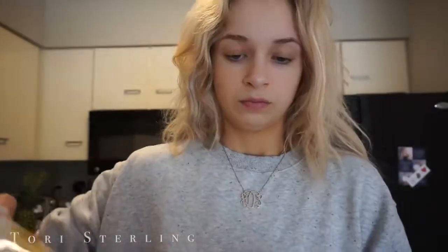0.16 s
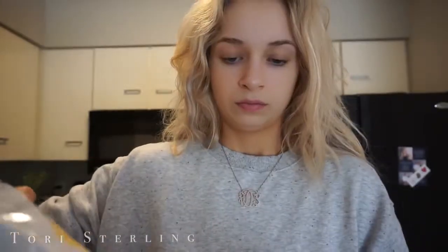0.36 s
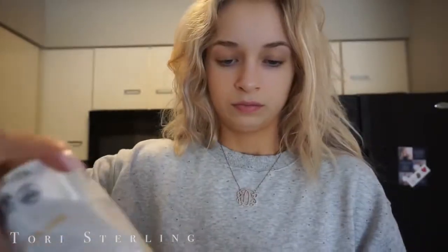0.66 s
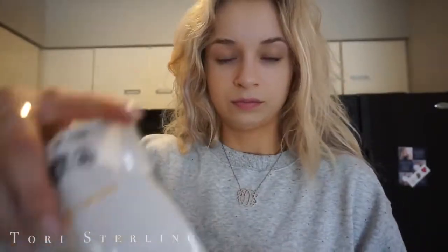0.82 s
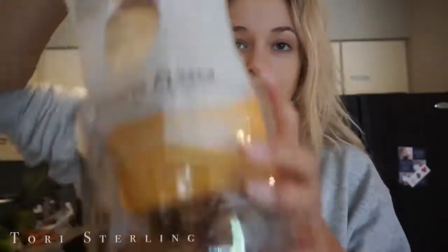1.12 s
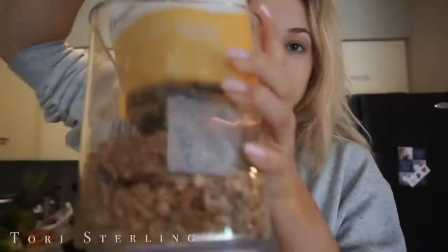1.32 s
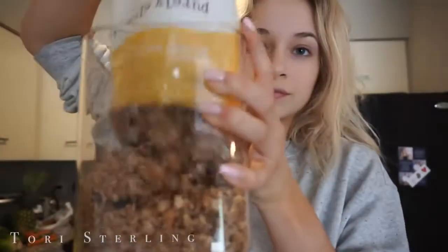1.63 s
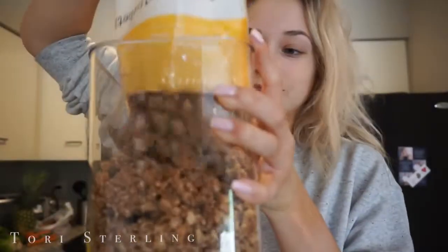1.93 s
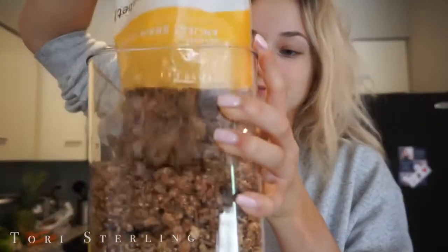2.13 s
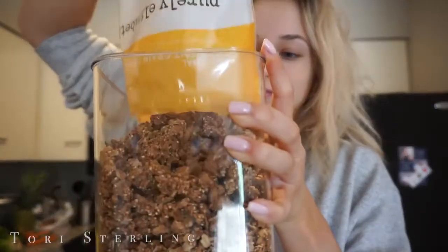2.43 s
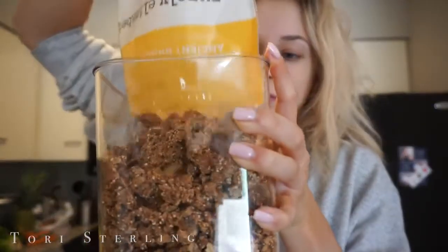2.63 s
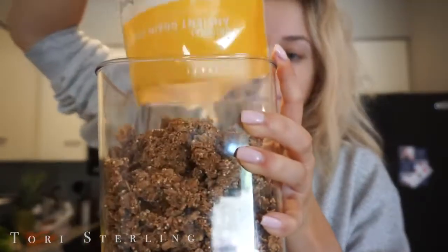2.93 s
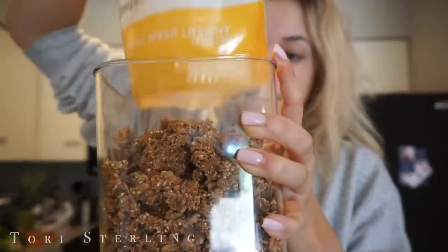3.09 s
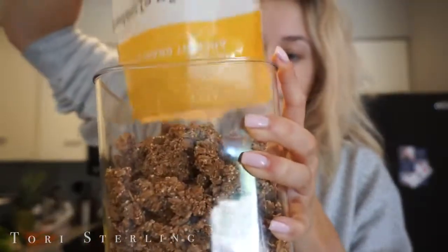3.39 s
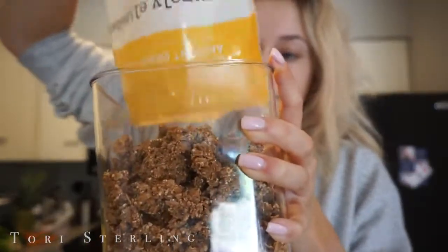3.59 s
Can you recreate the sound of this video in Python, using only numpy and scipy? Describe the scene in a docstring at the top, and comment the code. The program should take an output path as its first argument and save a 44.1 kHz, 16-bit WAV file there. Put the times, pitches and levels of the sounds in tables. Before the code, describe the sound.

Granola tumbling into a glass jar in surges, with dry clacks and crinkling pouch, then last pieces.

```python
"""In a small kitchen, dry granola slides out of a plastic pouch into a glass jar, close to the microphone.
Clusters patter as clumped grains in brief resonances and knock as short noise bursts; crumbs and film
crackle as brighter grains and ticks. The pouch thumps as damped sines, and the jar's modes ring faintly.
The flow surges, ends with a last shake and drops a few late pieces, over soft room noise and a hum."""
import sys
import numpy as np
from scipy import signal
from scipy.fft import rfft, irfft, next_fast_len
from scipy.io import wavfile
from scipy.ndimage import uniform_filter1d

SR = 44100
rng = np.random.default_rng(int(sys.argv[2]) if len(sys.argv) > 2 else 0)


def int16_out(signal):
    """Quantize to a 16-bit WAV file."""
    q = np.round(np.clip(np.atleast_2d(signal).T, -1, 1) * 32767)
    wavfile.write(sys.argv[1], SR, q.astype(np.int16))


N = 165375
T = np.arange(N) / SR  # seconds

# All levels in the event and level tables are relative: the layers trim them further.
# Spectrum of the kitchen air. Each row: frequency in Hz, relative level in dB.
AIR_COLOUR = [(30,-20),(80,-6.5),(245,-4.5),(300,-6),(395,3),(520,-24),(1070,-8.5),(1500,-25.5),(2500,-28),(16000,-47.5)]
# Kitchen reverberation. Each row: frequency in Hz, time to fall by 60 dB in seconds.
KITCHEN_T60 = [(200,0.21),(1500,0.37),(5000,0.29),(14000,0.13)]
# Modes of the jar, damped by the hand. Each entry: frequency in Hz.
JAR_MODES = [1260,1314,1520,1810,1890,1900,2150,2520,2800,3030,3330,3480]
# Pieces that strike the bare glass. Each row: start in seconds, level in dB, most excited frequency in Hz.
GLASS_HITS = [(1.448,-23,2600),(2.296,-25,3030),(2.701,-24,3400),(2.745,-32,1860),(2.791,-37,3070),(2.8089,-33,1830),(2.9165,-30,1210),(3.005,-40,1314),(3.0962,-31,1840)]
# Sharp creases of the film. Each row: time in seconds, level in dB, pitch in Hz.
FILM_SNAPS = [(0.4077,-24.5,8300),(0.465,-23,8500),(.4886,-21,8500),(.702,-18.5,6400),(0.7368,-21,11000),(1.2937,-20.5,10000),(2.096,-16.5,3950),(2.538,-26,11400),(2.645,-15.5,11100),(2.6983,-12,11300),(2.746,-24,9200),(2.7852,-16.5,12000),(2.791,-26,7740),(2.8532,-20,4530),(3.336,-52,3800)]
# The pouch flexes or a clump drops in it. Each row: start in seconds, level before decay in dB,
# pitch in Hz, time to fall by 60 dB in seconds.
POUCH_THUMPS = [(.017,-17,372,.036),(.283,-8,355,0.031),(.424,-19.5,372.5,0.14),(.462,-9.5,633,0.063),(.469,-11,533,.07),(.579,-17.5,363,0.051),(.742,-16,667,.12),(.888,-18,337,0.1),(1.028,-18,353,0.14),(1.06,-13.5,690,0.066),(1.094,-16.5,468,0.053),(1.164,-17.5,646,0.068),(1.829,-18,580,0.097),(2.328,-35.5,83.7,.26),(2.597,-7.5,720,.021),(2.601,-39.5,101,0.18),(2.913,-22.5,505,0.04)]
# Big pieces landing. Each row: start in seconds, level in dB, pitch in Hz.
PIECE_KNOCKS = [(0.015,-15.5,1180),(0.1763,-24,910),(.196,-15.5,1480),(0.2395,-13,1740),(.4622,-22,820),(.609,-14,2160),(0.7013,-9,2800),(.7423,-15.5,830),(.909,-21,2000),(0.97,-19,2470),(1.0069,-14,1500),(1.0577,-12,1380),(1.1212,-9.5,1590),(1.166,-16,1500),(1.2562,-19.5,1390),(1.345,-22,1630),(1.534,-17.5,2260),(1.803,-23,2200),(1.8304,-14.5,860),(1.954,-16.5,1700),(1.9989,-17,900),(2.0908,-13,1690),(2.148,-28,1700),(2.1782,-17,1470),(2.1961,-14,1250),(2.28,-11.5,1620),(2.3193,-16.5,1530),(2.373,-24,1860),(2.387,-27.5,770),(2.4047,-15,2500),(2.457,-25.5,1850),(2.642,-20,1610),(2.6751,-15.5,2940),(2.719,-14.5,3030),(2.747,-24,1940),(2.788,-21,3280),(2.8079,-21,1770),(2.8407,-21.5,3400),(2.9126,-23.5,1140),(2.998,-31,1540),(3.004,-30.5,1460),(3.0941,-27,1560),(3.2176,-37,1000),(3.3355,-27,2080),(3.494,-34,2240),(3.566,-40.5,1190)]
# Spectrum of those landings. Each row: frequency in Hz, gain in dB.
KNOCK_COLOUR = [(60,-31),(300,2.5),(600,8.5),(1000,-0.5),(2800,0),(3800,-5),(5500,-19.5),(9000,-12),(16000,-33)]
# Clumps break up and rattle down. Each row: start in seconds, length in seconds, level in dB;
# the edges are softened afterwards.
CLUMP_SLIDES = [(0.46,0.036,-25),(0.55,0.0087,-20),(.588,0.037,-24.5),(0.881,0.11,-29.5),(1.04,0.047,-26),(1.399,0.034,-30),(1.534,0.058,-26),(1.741,0.04,-22.5),(1.799,0.035,-23.5),(1.952,0.015,-24),(1.979,0.047,-29.5),(2.159,0.092,-34.5),(2.264,0.05,-31),(2.366,0.021,-25),(2.568,0.083,-29.5)]
# Pattering clusters. Each row: time in seconds, level in dB.
PATTER_LEVEL = [(0,-40),(.02,-31.5),(.08,-38.5),(.26,-30.5),(.42,-27.5),(.62,-25.5),(.87,-27.5),(.91,-19.5),(1.15,-21.5),(1.21,-33),(1.35,-31.5),(1.57,-24.5),(1.7,-24.5),(1.82,-25.5),(1.88,-28.5),(2.12,-32.5),(2.39,-33.5),(2.42,-35.5),(2.56,-31),(2.6,-19.5),(2.72,-33),(2.88,-45),(3.13,-55.5),(3.75,-51.5)]
# Hollow tumbling inside pouch and jar. Each row: time in seconds, level in dB.
TUMBLE_LEVEL = [(0,-54),(.02,-33),(.08,-36.5),(.3,-30),(.4,-30),(.5,-26),(.68,-33.5),(.87,-33),(.9,-25),(1.11,-25),(1.22,-40),(1.5,-31.5),(1.82,-31),(2.1,-38),(2.38,-42.5),(2.43,-47.5),(2.55,-34),(2.6,-29.5),(2.76,-50),(3.75,-50)]
# Crackle of crumbs and film. Each row: time in seconds, level in dB.
CRACKLE_LEVEL = [(0,-53.5),(.38,-43),(.48,-35.5),(.95,-38),(1.13,-30.5),(1.23,-44),(1.5,-39),(1.78,-33),(1.87,-40),(2.35,-44),(2.44,-48.5),(2.55,-45.5),(2.6,-31),(2.69,-34),(2.87,-48),(3.13,-68),(3.75,-69.5)]
# Spectra of these three layers. Each row: frequency in Hz, relative level in dB.
PATTER_COLOUR = [(100,-56),(400,-18.5),(800,-5),(1350,-0.5),(2500,1.5),(3400,-5),(4500,-14),(6500,-4),(16000,-55)]
TUMBLE_COLOUR = [(30,-45),(75,1.5),(140,-6),(240,-7),(360,-0.5),(650,0),(1000,1),(2000,-8.5),(8000,-63)]
CRACKLE_COLOUR = [(300,-78),(2000,13),(4000,7.5),(7000,-3),(10000,0),(13000,-1),(16000,-6)]

AIR_DB, HUM_HZ, HUM_DB = -47.5, 244, -52.5
LEFT_LEAD_MS, LEAD_SPREAD_MS = 0.038, .028  # how much earlier the left port hears it
CLINK_OCTAVES, JAR_T60_S = .2, .07
SNAP_S, CRUMBLE_S = .0006, 0.00086  # time for a brittle contact to build up
POUCH_WAVER = .04  # spread of pitch, as a share
RING_ROUGHNESS, RATTLE_PER_S = .3, 160
SLIDE_EDGE_S, SLIDE_TUMBLE_DB, SLIDE_CRACKLE_DB = 0.02, -3, -5
CLUMPS_PER_S = 45
THINNING, SPARSEST = .5, .15  # exponent on the gain, smallest share of the contact rate
CUTOFF_HZ = 16100


def from_db(db):
    """Decibels to gain."""
    return 10 ** (np.asarray(db) / 20)


def rms_one(x):
    """Scale to unit power."""
    return x / np.sqrt(np.mean(x ** 2) + 1e-20)


def level(curve):
    """Gain over time from rows of seconds and dB."""
    return from_db(np.interp(T, *np.transpose(curve)))


def at_hz(points, hz):
    """Read a table on a log-frequency axis."""
    f, v = np.transpose(points)
    return np.interp(np.log(np.maximum(hz, 1)), np.log(f), v)


def colour(x, points):
    """Causal (minimum-phase) filter with the given spectrum."""
    n = 2 * next_fast_len(N)
    hz = np.arange(n // 2 + 1) * SR / n
    cepstrum = irfft(np.log(from_db(at_hz(points, hz))))
    # Folding the cepstrum forward makes the phase minimal
    cepstrum[1:n // 2] *= 2
    cepstrum[n // 2 + 1:] = 0
    return irfft(rfft(x, n) * np.exp(rfft(cepstrum)))[..., :N]


def resonate(x, hz, q):
    """A resonance with gain 1 on top."""
    w = 2 * np.pi * min(hz, SR * .45) / SR
    a = np.sin(w) / (2 * q)
    return signal.lfilter([a, 0, -a], [1 + a, -2 * np.cos(w), 1 - a], x + 1e-18)


def add(out, s, sound):
    """Mix a sound in at a time in seconds."""
    i = int(np.clip(s * SR, 0, N - 1))
    out[..., i:i + sound.shape[-1]] += sound[..., :N - i]


def place(x, pan_db, lead_ms):
    """Two microphone ports: a level and an arrival difference, positive towards the left."""
    n = next_fast_len(len(x))
    half = np.array([[.5], [-.5]])
    turn = 2j * np.pi * np.arange(n // 2 + 1) * SR / n * lead_ms / 1000
    shifted = irfft(rfft(x, n) * np.exp(half * turn), n)[:, :len(x)]
    return shifted * from_db(half * pan_db)


def drift(per_s=CLUMPS_PER_S):
    """Smooth random wander of unit spread, such as how thickly the pieces come."""
    steps = rng.standard_normal(1024)
    return rms_one(np.interp(T * per_s, np.arange(len(steps)), steps))


def thinned(curve):
    """Share of the full contact rate: a weak flow breaks up into separate pieces."""
    gain = level(curve)
    return np.maximum((gain / gain.max()) ** THINNING, SPARSEST)


def rattled(ring):
    """Loose pieces lying against a vibrating wall roughen its ring."""
    return ring * (1 + RING_ROUGHNESS * drift(RATTLE_PER_S)[:len(ring)])


def burst(decay_s, hz, q):
    """A brittle contact: a short crumble into one resonance, with the energy of 1 ms at unit level."""
    t = T[:1024]
    crumble = rng.standard_normal(len(t)) * t * np.exp(-t / decay_s)
    x = resonate(crumble, hz, q)
    return x / np.sqrt(np.sum(x ** 2) / (SR / 1000))


def grains(spectrum, low_hz, high_hz, per_s, size_db, clump_db, q, pan_db, scatter_ms, even_s, count=16):
    """Random uneven contacts in clumps, dealt to brief pitches with their own places; evened in level."""
    born = rng.random(N) < per_s / SR
    size = from_db(size_db * np.minimum(rng.exponential(1, N), 4))
    sizes = born * size * rng.choice([-1, 1], N)
    dealt, together, out = rng.integers(0, count, N), drift(), 0
    for k, hz in enumerate(np.geomspace(low_hz, high_hz, count)):
        clumping = from_db(clump_db * (drift() + .5 * together))
        contacts = sizes * (dealt == k) * clumping
        lead_ms = LEFT_LEAD_MS + scatter_ms * np.cos(2 * k)
        out = out + place(resonate(contacts, hz, q), pan_db, lead_ms)
    out = colour(out, spectrum)
    power = np.mean(out ** 2, axis=0)
    for _ in range(2):
        power = uniform_filter1d(power, max(int(even_s * SR), 2))
    return out / np.sqrt(np.abs(power) + power.mean() / 100)


def room_tone():
    """Soft kitchen air as coloured noise, nearly mono, with an appliance hum as one steady sine."""
    mid, side = colour(rng.standard_normal((2, N)), AIR_COLOUR)
    air = rms_one(mid + 0.14 * side * [[1], [-1]])
    hum = np.sin(2 * np.pi * HUM_HZ * T)
    return from_db(AIR_DB) * air + from_db(HUM_DB) * hum


def kitchen(x, width):
    """A diffuse noise tail of unit energy; the middle lingers longest and the top dies fastest."""
    t = T[:SR // 2]
    edges, tail = np.geomspace(60, 17000, 9), 0
    for low, high in zip(edges, edges[1:]):
        band = signal.butter(2, [low, high], "band", fs=SR, output="sos")
        mid, side = signal.sosfilt(band, rng.standard_normal((2, len(t))))
        decay = from_db(-60 * t / at_hz(KITCHEN_T60, np.sqrt(low * high)))
        tail = tail + (mid + width * side * [[1], [-1]]) * decay
    tail = tail * (t > .004)  # a short gap before the tail
    return signal.fftconvolve(x, tail / np.sqrt(np.sum(tail ** 2) / 2), axes=1)[:, :N]


def glass():
    """The held jar rings faintly when a piece hits its wall; each hit favours a group of modes."""
    out = np.zeros(N)
    t, modes = T[:SR // 2], np.array(JAR_MODES)[:, None]
    for s, db, hz in GLASS_HITS:
        strength = np.exp(-.5 * (np.log2(modes / hz) / CLINK_OCTAVES) ** 2)
        cycles = modes * t + rng.random(modes.shape)
        ring = np.sum(strength * np.sin(2 * np.pi * cycles), axis=0)
        add(out, s, from_db(db + 1.0 - 60 * t / JAR_T60_S) * rattled(ring))
    return place(out, -5.0, 0)


def snaps():
    """Creases flip with bright ticks, each from its own spot on the pouch."""
    out = np.zeros((2, N))
    for s, db, hz in FILM_SNAPS:
        tick = from_db(db) * burst(SNAP_S, hz, 1.0)
        # Started early, so that the crumble is strongest at the listed time
        add(out, s - SNAP_S, place(tick, rng.normal(-1.4, 4.3), rng.normal(0, LEAD_SPREAD_MS / 2)))
    return out * from_db(-4.0)


def thumps():
    """Hollow, damped notes of the pouch; each builds up over its first cycle and wavers as the film flexes."""
    out = np.zeros(N)
    t = T[:SR // 4]
    for s, db, hz, t60 in POUCH_THUMPS:
        swell = np.sin(np.pi / 2 * np.minimum(hz * t, 1)) ** 2
        cycles = np.cumsum(hz * (1 + POUCH_WAVER * drift()[:len(t)])) / SR
        note = rattled(np.sin(2 * np.pi * cycles))
        add(out, s, from_db(db - 60 * t / t60) * note * swell)
    return place(out, 0, LEFT_LEAD_MS)


def knocks():
    """Big clusters land with dry clacks a few cycles long."""
    out = np.zeros((2, N))
    for s, db, hz in PIECE_KNOCKS:
        clack = from_db(db) * burst(CRUMBLE_S, hz, 1.4)
        add(out, s, place(clack, rng.normal(-0.44, .8), rng.normal(LEFT_LEAD_MS, LEAD_SPREAD_MS)))
    return from_db(5.0) * colour(out, KNOCK_COLOUR)


def slides():
    """Strength of the collapsing clumps over time, with soft edges."""
    out = np.zeros(N)
    for s, length, db in CLUMP_SLIDES:
        inside = np.minimum(T - s, s + length - T)
        out += from_db(db) * np.clip(inside / SLIDE_EDGE_S + .5, 0, 1)
    return out


def pour():
    """The stream: clusters patter, the mass tumbles hollowly, crumbs and film crackle; slides raise all three."""
    patter = grains(PATTER_COLOUR, 788, 3690, per_s=2700 * thinned(PATTER_LEVEL), size_db=4.0,
                    clump_db=3.0, q=10.0, pan_db=-0.4, scatter_ms=0.0083, even_s=0.1, count=36)
    tumble = grains(TUMBLE_COLOUR, 172.3, 855, per_s=900 * thinned(TUMBLE_LEVEL), size_db=3.0,
                    clump_db=1.5, q=4.0, pan_db=-0.2, scatter_ms=0.099, even_s=0.04)
    crackle = grains(CRACKLE_COLOUR, 3630, 17300, per_s=6000 * thinned(CRACKLE_LEVEL), size_db=-1.0,
                     clump_db=3.5, q=1.36, pan_db=-1.0, scatter_ms=0.069, even_s=0.19)
    surge = slides()
    # Flow and slides add as powers
    patter = patter * np.hypot(from_db(-2.5) * level(PATTER_LEVEL), surge)
    tumble = tumble * np.hypot(from_db(-0.5) * level(TUMBLE_LEVEL), from_db(SLIDE_TUMBLE_DB) * surge)
    crackle = crackle * np.hypot(from_db(2.5) * level(CRACKLE_LEVEL), from_db(SLIDE_CRACKLE_DB) * surge)
    return patter + tumble, crackle


def scene():
    """Granola and pouch close by, the kitchen around them; the nearest clacks stay driest."""
    stream, crackle = pour()
    clacks = knocks()
    body = stream + thumps() + glass()
    bright = crackle + snaps()
    body_room = kitchen(from_db(-9.5) * body + from_db(-12) * clacks, width=0.12)
    bright_room = from_db(-6.0) * kitchen(bright, width=1.0)
    return body + clacks + bright + body_room + bright_room + room_tone()


def record(dry):
    """Peaks are rounded, the top is cut."""
    rounded = .7 * np.tanh(dry / .7)
    low_pass = signal.ellip(10, .1, 80, CUTOFF_HZ, fs=SR, output="sos")
    return signal.sosfilt(low_pass, rounded)


dry = scene()
out = record(dry)
int16_out(out)
```